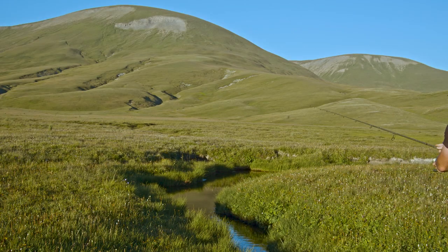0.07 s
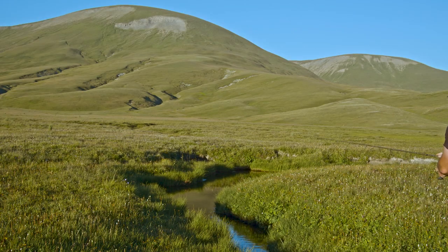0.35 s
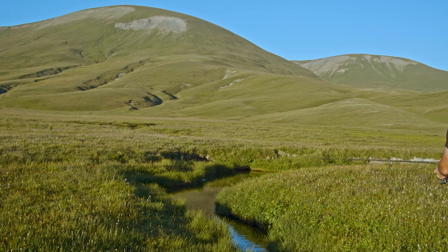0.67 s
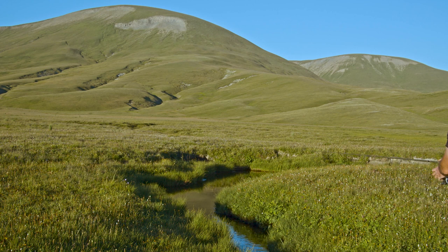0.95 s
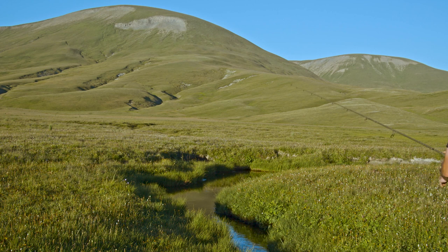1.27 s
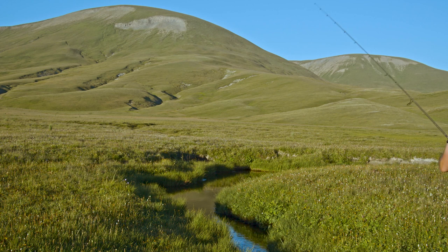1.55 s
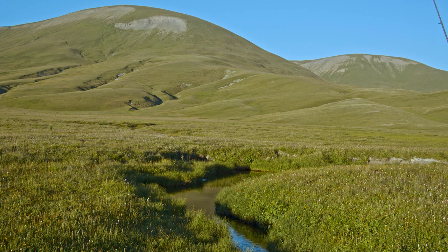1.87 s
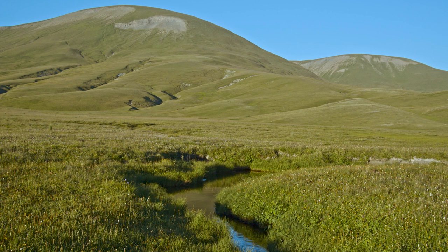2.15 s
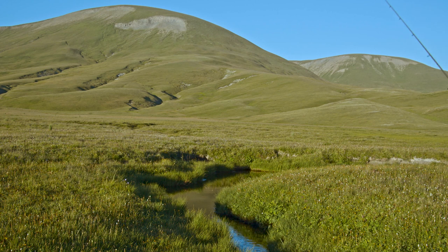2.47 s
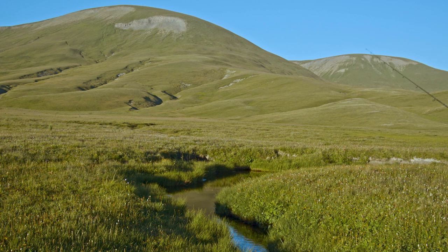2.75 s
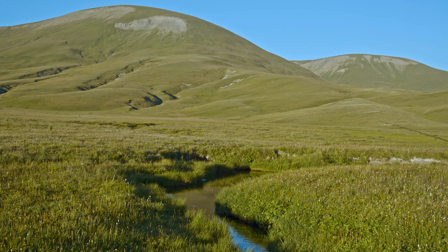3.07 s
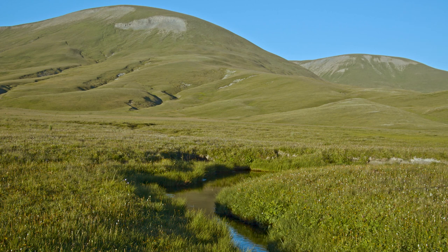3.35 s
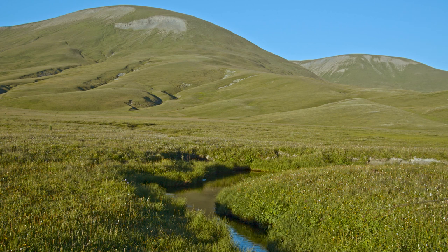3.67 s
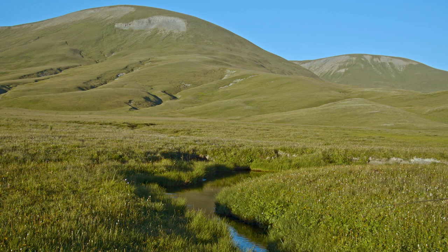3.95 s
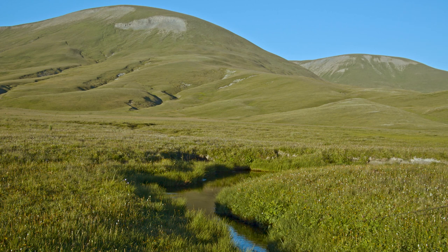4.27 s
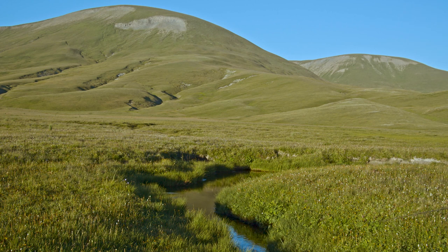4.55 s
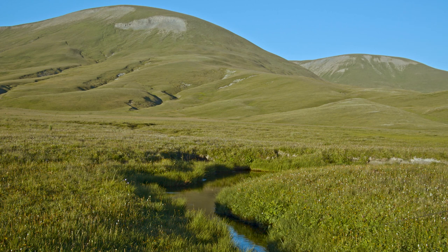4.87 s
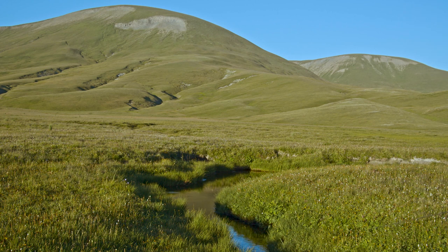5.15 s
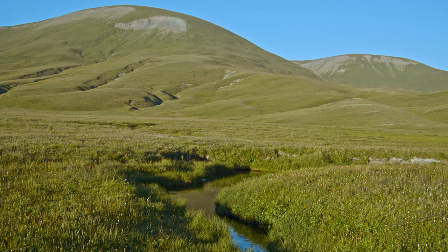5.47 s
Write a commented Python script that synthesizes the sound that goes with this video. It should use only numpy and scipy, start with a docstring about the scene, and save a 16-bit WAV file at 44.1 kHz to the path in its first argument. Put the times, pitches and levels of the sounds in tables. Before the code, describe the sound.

One sharp, rattling clack of a fishing reel closing near the microphone stands out in a quiet open meadow. A short, much softer splash follows in the stream, then a little cloth rustle and a few light ticks of fishing line. Distant larks whistle and chirp on and off throughout, above a low wind rumble, barely audible running water and a thin camera whine.

```python
"""An angler casts into a meadow stream. From the start a far lark whistles over low wind on the
microphone, murmuring water and the camera's own whine. At 1.5 s, just to the right, the reel's bail
snaps shut: the impact rings the reel's modes and rattles its loose parts. Near 2.4 s the water slaps
and drops and air pockets ring in plips. Around 3 s friction makes sleeve and line rustle as the rod
is lowered; the larks' chips and falling slurs come last."""
import sys
import numpy as np
from scipy import signal
from scipy.fft import rfft, irfft, next_fast_len
from scipy.io import wavfile
from scipy.ndimage import map_coordinates

SR = 44100
rng = np.random.default_rng(int(sys.argv[2]) if len(sys.argv) > 2 else 0)


def unload_wav(signal):
    """Save mono or channel-first audio to the path in sys.argv[1] as 16-bit WAV at rate SR, clipped to [-1, 1]."""
    wavfile.write(
        sys.argv[1],
        SR,
        np.round(np.clip(np.atleast_2d(signal).T, -1, 1) * 32767).astype(np.int16),
    )


N = 247842


def reel(crack_db=-12, crack_t60=0.014, rattle_db=-25, rattle_t60=0.14, low_hz=680,
         hard_db=-16, bounce_s=.0026, bounce_loss_db=9.5, bounce_tilt_db=8):
    """Modal ringing: each impact excites the reel's damped modes, a crack and a loose rattle."""
    # contacts of reel and rod: (time [s], level [dB], tilt [dB/octave])
    contacts = [(0.7109, -40.5, -1), (.7645, -56, 12), (1.487, -36, -1), (1.4945, -40, -2), (1.505, -20, 2),
                (1.5158, -27.5, -2), (1.5247, -2.5, 0), (1.5561, -12, 0), (1.572, -21, 0), (1.875, -48, 21),
                (2.2124, -51, 20), (3.6995, -42, -6), (3.709, -40, -6)]
    # modes of the reel: (frequency [Hz], level [dB], t60 [s])
    resonances = [(823, -30.5, 0.045), (1390, -24, 0.036), (1736, -15.5, 0.03), (2310, -13.5, 0.022),
                  (2480, -23.5, .065), (2710, -14.5, 0.023), (3260, -6.5, 0.011), (4100, -3, 0.0034),
                  (4320, -17, 0.051), (4800, -14, 0.0062), (5400, -9.5, 0.018), (5470, -1.5, 0.0034),
                  (6340, -16, 0.027), (6830, -11, 0.005), (7340, -27, 0.018)]
    # noise of its loose parts: (frequency [Hz], density [dB])
    spectrum = [(200, -36), (500, -24), (800, -19), (1400, 0.5), (2200, 5.5), (3500, 7), (6500, -1.5),
                (8300, -7.5), (12000, -11.5), (14000, -11), (15500, -3)]
    out, t = np.zeros((2, N)), np.arange(SR // 6) / SR
    modes = np.array([(-1) ** k * amp(db) * decay(t, t60) * np.sin(2 * np.pi * hz * t)
                      for k, (hz, db, t60) in enumerate(resonances)])
    # hard contacts rebound twice, each time weaker and brighter
    impacts = [(s + k * bounce_s * rng.uniform(.9, 1.1), db - k * bounce_loss_db,
                tilt + k * bounce_tilt_db)
               for s, db, tilt in contacts for k in range(3 if db > hard_db else 1)]
    for s, db, tilt in impacts:
        ring = amp(rng.normal(0, 1, (2, len(resonances)))) @ modes
        crack = amp(crack_db) * decay(t, crack_t60) * noise(spectrum, len(t), alike=0.79)
        rattle = amp(rattle_db) * decay(t, rattle_t60) * noise(spectrum, len(t), alike=0.052)
        brightness = lambda hz: amp(tilt * np.log2(np.clip(hz, 1500, 8000) / 3800))
        add(out, s, amp(db) * filtered(ring + crack + rattle, brightness))
    # so small a body radiates bass poorly
    radiation = signal.butter(2, low_hz, "high", fs=SR, output="sos")
    return placed(signal.sosfilt(radiation, out), lag_ms=0.13, right_db=4.5)


def splash(slap_db=-1, slap_t60=0.0094, slap_rise_s=0.00033, spray_db=-22, spray_t60=0.091,
           plip_db=-1, plip_rise_s=0.00073):
    """Impact and resonance: water slaps and spatters as noise; drops and air pockets ring briefly, and a dull
    knock rings at 3.7 s."""
    # slaps on the water: (time [s], level [dB])
    slaps = [(2.369, -48), (2.444, -37), (2.4493, -24), (2.4519, -25), (2.459, -45)]
    # noise of the spray: (frequency [Hz], density [dB])
    spray = [(400, -27), (1000, -25), (1400, 2.5), (2700, 7.5), (4500, 0), (5800, -11), (9000, -14.5),
             (15000, -40)]
    # fine spatter round the slaps: (peak time [s], level [dB], length [s])
    spatter = [(2.397, -49, 0.028), (2.45, -51, 0.059)]
    # drops and air pockets, and at 3.7 s a dull knock: (time [s], level [dB], pitch [Hz], t60 [s], glide
    # [octaves/s])
    plips = [(2.369, -44.5, 4620, 0.03, -27), (2.376, -40, 3450, 0.016, 7), (2.407, -41.5, 2770, 0.069, -9),
             (2.409, -42, 1070, 0.053, 3), (2.435, -41, 2900, 0.022, -25), (2.452, -47.5, 523, 0.068, 5),
             (2.4816, -31, 4900, 0.0085, -10), (2.4865, -44, 4000, 0.021, -21),
             (3.003, -38, 452, 0.038, -50), (3.7, -50.5, 1170, 0.11, 0)]
    out = swells(spatter, rise_share=0.4) * grains(spray, grain_db=4, per_s=600, alike=0.47)
    t = np.arange(SR // 8) / SR
    slap_and_spray = amp(slap_db) * decay(t, slap_t60) + amp(spray_db) * decay(t, spray_t60)
    burst = (1 - np.exp(-t / slap_rise_s)) * slap_and_spray
    for s, db in slaps:
        add(out, s, amp(db) * burst * noise(spray, len(t), alike=0.96))
    for s, db, hz, t60, octaves_per_s in plips:
        unsteady = 1 + .05 * wobble(900, len(t))
        ring = np.sin(cycle(hz * unsteady * 2 ** (octaves_per_s * t)))
        envelope = (1 - np.exp(-t / plip_rise_s)) * decay(t, t60)
        add(out, s, amp(db + plip_db) * envelope * ring)
    return placed(out, lag_ms=-0.043, right_db=2.5)


def sleeve_and_line(rest_db=-62, settle_db_per_s=0.7, tick_db=-3, tick_t60=0.019):
    """Friction noise: cloth rubs in fine grains; the line hisses and ticks through the rod rings."""
    # strokes of the sleeve: (peak time [s], level [dB], length [s])
    strokes = [(.712, -50, 0.042), (1.878, -51.5, 0.17), (1.94, -53.5, 0.056), (2.235, -50.5, .04),
               (3.03, -49, 0.025), (3.05, -52.5, 1), (3.2, -46.5, 0.12), (3.73, -61, 0.36)]
    # rubbing cloth: (frequency [Hz], density [dB])
    cloth = [(100, -6), (250, 0), (700, -7), (1500, -2), (3000, 0), (4500, 0), (6400, -4.5), (8500, -10),
             (11000, -16), (15000, -7)]
    # pulls of line: (peak time [s], level [dB], length [s])
    pulls = [(.25, -55, 0.018), (.3, -65.5, 0.63), (2.9, -63, .25), (3.205, -45.5, 0.093), (3.37, -62, .08)]
    # sliding line: (frequency [Hz], density [dB])
    line_hiss = [(2500, -12), (4500, -7.5), (5700, -1.5), (6500, -3), (8000, -8), (10000, -24),
                 (15000, -16)]
    # ticks of line on the rings: (time [s], level [dB], pitch [Hz])
    ticks = [(2.7834, -45.5, 6200), (3.0782, -39, 6640), (3.1875, -40, 6100), (3.2545, -49, 4700),
             (3.273, -54, 4600), (3.341, -34, 4670), (3.6997, -37, 4360), (3.703, -37, 2790)]
    rub = lambda spectrum: grains(spectrum, grain_db=2, per_s=500, alike=0.43)
    rest = amp(rest_db - settle_db_per_s * np.arange(N) / SR)  # faint rustle between strokes
    out = np.hypot(rest, swells(strokes, rise_share=0.45)) * rub(cloth)
    out += swells(pulls, rise_share=0.75) * rub(line_hiss)
    t = np.arange(SR // 16) / SR
    for s, db, hz in ticks:
        band = [(hz / 2, -24), (hz * 0.72, -9), (hz, 0), (hz * 1.2, -11), (hz * 2, -28)]
        add(out, s, amp(db + tick_db) * decay(t, tick_t60) * noise(band, len(t), alike=0.35))
    return placed(out, lag_ms=0.15, right_db=1.5)


def larks(meadow_db=-7, meadow_t60=0.14, slur_s=0.14, top_s=0.0293, top_hz=3690, drop_hz=1050):
    """Scattering: the larks' gliding tones arrive directly and as a short diffuse tail off the meadow."""
    # buzzy trills: (time [s], length [s], pitch [Hz], level [dB])
    trills = [(.335, 0.071, 3420, -54.5), (.764, 0.083, 3290, -55.5), (.8, 0.1, 4160, -69),
              (1.163, .2, 4700, -69), (2.065, .056, 4300, -61.5), (2.639, 0.074, 3830, -63),
              (3.259, 0.027, 4580, -49.5), (3.97, 0.048, 4760, -61), (4.043, 0.074, 4680, -60),
              (4.745, .18, 3300, -66), (4.813, .1, 4500, -69)]
    # plain whistles: (time [s], length [s], pitch [Hz], level [dB], sag [octaves])
    whistles = [(.53, .055, 4300, -69, .14), (0.967, 0.062, 4330, -64, 0.12),
                (1.436, 0.044, 4500, -64, 0.062), (1.617, .21, 4090, -68, 0.13), (4.17, .045, 4250, -68, 0),
                (4.299, .023, 3300, -67.5, .06), (5.483, .137, 3000, -74, .02)]
    # rising chips: (time [s], pitch [Hz], level [dB])
    chips = [(4.62, 4250, -67), (4.638, 3900, -60), (4.66, 3700, -62), (4.734, 3780, -66)]
    # slurs that arch over and fade as they fall: (time [s], level [dB])
    slurs = [(5.078, -63.5), (5.338, -60.5)]
    song = np.zeros(N)
    add(song, 0, long_call())
    for s, length, hz, db in trills:
        add(song, s, note(glide(length, hz, octaves=-0.105), db, depth=.88))
    for s, length, hz, db, sag in whistles:
        add(song, s, note(glide(length, hz, -sag), db))
    for s, hz, db in chips:
        add(song, s, note(glide(0.0207, hz, octaves=0.094), db))
    fall = ((np.arange(int(slur_s * SR)) / SR - top_s) / (slur_s - top_s)) ** 2
    for s, db in slurs:
        add(song, s, note(top_hz - drop_hz * fall, db - 12 * fall, depth=.3))
    t = np.arange(SR // 3) / SR
    tail = rng.standard_normal((2, len(t))) * decay(t, meadow_t60)
    scatter = signal.fftconvolve(song[None], tail / np.linalg.norm(tail[0]), axes=1)[:, :N]
    return placed(song, lag_ms=-0.27, right_db=0) + amp(meadow_db) * scatter


def long_call(length_s=.378, db=-59.5, final_hz=3740, scoop_hz=1490, scoop_s=.03, sag_hz=1020,
              sag_s=.13, trill_s=0.18, trill_db=10, attack_s=.02, release_s=.008):
    """Fading modulation: a trilled upward scoop settles into a pure, sagging whistle."""
    t = np.arange(int(length_s * SR)) / SR
    hz = final_hz + sag_hz * np.exp(-t / sag_s) - scoop_hz * np.exp(-(t / scoop_s) ** 2)
    depth = np.clip(1 - (t / trill_s) ** 2, 0, 1)
    envelope = (1 - np.exp(-t / attack_s)) * np.clip((length_s - t) / release_s, 0, 1)
    tone = whistle(hz, depth, trill_hz=68.4, sweep=0.03, hoarse=0.019)
    return amp(db + trill_db * depth) * envelope * tone


def note(hz, db, depth=0, flutter_db=3):
    """Scintillation: moving air makes the level of one rounded note flutter."""
    arch = np.sqrt(np.abs(np.sin(np.linspace(0, np.pi, len(hz)))))
    gain = amp(db + flutter_db * wobble(132, len(hz)))
    return gain * arch * whistle(hz, depth, trill_hz=83.8, sweep=-0.017, hoarse=0.052)


def whistle(hz, depth, trill_hz, sweep, hoarse):
    """Amplitude and frequency modulation: a trill chops a pure tone into slightly hoarse sweeps."""
    beat = cycle(np.full(len(hz), trill_hz))
    gate = 1 - depth * (1 - np.sin(beat)) / 2
    bend = depth * (hoarse * wobble(1190, len(hz)) - sweep * np.cos(beat))
    return np.sqrt(2) * gate ** 2 * np.sin(cycle(hz * (1 + bend)))


def wind(gain_db=3, eddy_db=.8, eddies_per_s=7):
    """Turbulence: slow gusts and quick eddies buffet each microphone port a little differently."""
    # course of the gusts: (time [s], level [dB])
    gusts = [(0.0, -44.5), (0.12, -39), (0.66, -42.5), (0.7, -47.5), (3.6, -50.5), (3.71, -45),
             (4.46, -52.5), (4.51, -47), (5.62, -46.5)]
    # buffeting pressure: (frequency [Hz], density [dB])
    rumble = [(10, -3.5), (20, 4), (30, 2.5), (45, -4.5), (65, -4.5), (95, -11.5), (125, -23), (170, -26),
              (260, -32.5), (500, -60)]
    gust_db = np.interp(np.arange(N) / SR, *np.transpose(gusts))
    return amp(gust_db + gain_db + eddy_db * wobble(eddies_per_s)) * noise(rumble, N, alike=0.33)


def stream(murmur_db=-58.5, ripple_db=1):
    """Flow noise: running water murmurs with a gently rippling level."""
    # running water: (frequency [Hz], density [dB])
    murmur = [(90, 6.5), (170, -1.5), (300, -1), (520, -0.5), (760, 3), (1100, -7), (1600, -11),
              (3500, -17), (6000, -27.5)]
    return amp(murmur_db + ripple_db * wobble(25)) * noise(murmur, N, alike=0.75)


def camera(hiss_db=-61, drift=0.00039, flutter_db=0.5):
    """Self-noise: the microphone hisses and the camera's works whine in slightly unsteady tones."""
    # microphone hiss: (frequency [Hz], density [dB])
    hiss = [(100, 10), (500, 5), (1200, 5), (2200, 4), (3800, -3.5), (5500, -4), (9000, -1), (15500, -2.5)]
    # tones of the works: (frequency [Hz], left level [dB], right level [dB])
    partials = [(429.4, -67.5, -74.5), (859, -71.5, -72.5), (1195, -72.5, -93), (1455, -99, -76.5),
                (1717, -79.5, -70), (1855, -89.5, -82), (1863, -70, -73), (2090, -80, -75),
                (2186, -101, -73.5), (7300, -86, -78), (7390, -78, -76.5), (7410, -73.5, -69)]
    phase_per_hz = cycle(1 + drift * wobble(10))
    tones = sum(amp([[left], [right]]) * np.sin(hz * phase_per_hz) for hz, left, right in partials)
    whine = amp(flutter_db * wobble(13)) * np.sqrt(2) * tones
    return amp(hiss_db) * noise(hiss, N) + placed(whine, lag_ms=0.031, right_db=0.5)


def amp(db):
    """Decibels as an amplitude ratio."""
    return 10 ** (np.asarray(db) / 20)


def unit(x):
    """Normalisation to rms 1."""
    return x / np.sqrt(np.mean(x ** 2) + 1e-20)


def decay(t, t60):
    """Exponential damping: 60 dB in t60 seconds."""
    return amp(-60 * t / t60)


def cycle(hz):
    """Phase as the integral of frequency."""
    return 2 * np.pi * np.cumsum(hz) / SR


def glide(length, hz, octaves):
    """An exponential pitch sweep centred on hz."""
    return hz * 2 ** (octaves * np.linspace(-.5, .5, int(length * SR)))


def wobble(per_s, size=N):
    """Smooth random modulation with per_s knots a second."""
    knots = rng.standard_normal(int(size * per_s / SR) + 4)
    return map_coordinates(knots, [np.arange(size) * per_s / SR])


def swells(rows, rise_share):
    """Power sum of exponential swells; each length splits into a rise and a fall time constant."""
    t = np.arange(N) / SR
    gains = [amp(db) * np.exp(-np.maximum((s - t) / rise_share, (t - s) / (1 - rise_share)) / length)
             for s, db, length in rows]
    return np.linalg.norm(gains, axis=0)


def filtered(x, response):
    """Linear filtering: the spectrum of x times a frequency response."""
    size = x.shape[-1]
    padded = next_fast_len(size + 8192)
    hz = np.fft.rfftfreq(padded, 1 / SR)
    return irfft(rfft(x, padded) * response(hz), padded)[..., :size]


def noise(spectrum, size, alike=0):
    """Partly coherent stereo noise of rms 1; the sides share the fraction alike of their power."""
    white = rng.standard_normal((3, size))
    pair = np.sqrt(alike) * white[2] + np.sqrt(1 - alike) * white[:2]
    knot_hz, knot_db = np.transpose(spectrum)
    colour = lambda hz: amp(np.interp(np.log(hz + 1), np.log(knot_hz + 1), knot_db))
    return unit(filtered(pair, colour))


def grains(spectrum, grain_db, per_s, alike):
    """Fast random amplitude modulation makes noise grainy."""
    return unit(amp(grain_db * wobble(per_s)) * noise(spectrum, N, alike))


def placed(x, lag_ms, right_db):
    """Time and level differences: a source to the right reaches the left port later and weaker."""
    side = np.array([[-.5], [.5]])
    return filtered(x, lambda hz: amp(side * right_db) * np.exp(2j * np.pi * hz * side * lag_ms / 1000))


def add(track, s, sound):
    """Superpose a sound on a track from time s."""
    part = track[..., max(round(s * SR), 0):][..., :sound.shape[-1]]
    part += sound[..., :part.shape[-1]]


def scene():
    """Superposition: the pressures of all sources add."""
    return reel() + splash() + sleeve_and_line() + larks() + wind() + stream() + camera()


def record(dry, ceiling=.92, top_hz=15850):
    """Saturation and band limiting: the highest peaks are rounded and the top treble is cut."""
    rounded = dry / (1 + (dry / ceiling) ** 6) ** (1 / 6)
    return filtered(rounded, lambda hz: hz < top_hz)


dry = scene()
out = record(dry)
unload_wav(out)
```